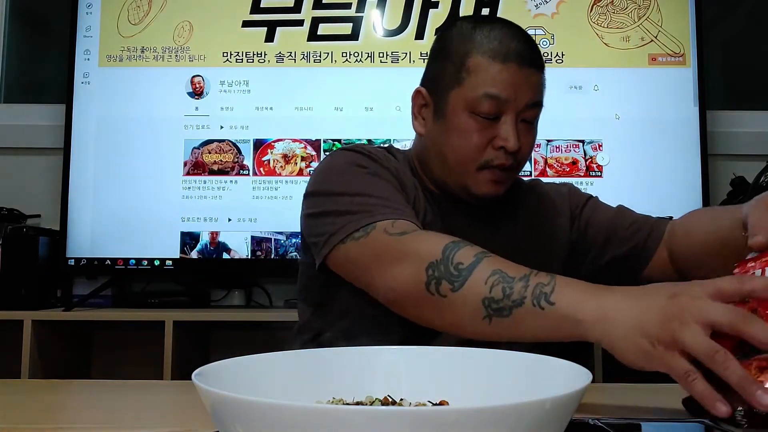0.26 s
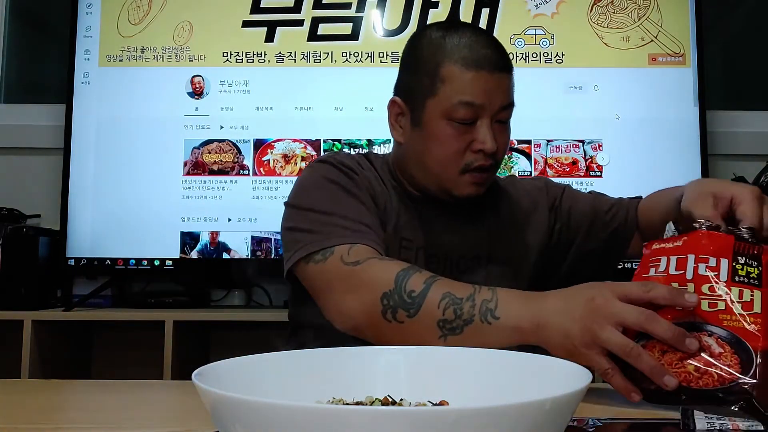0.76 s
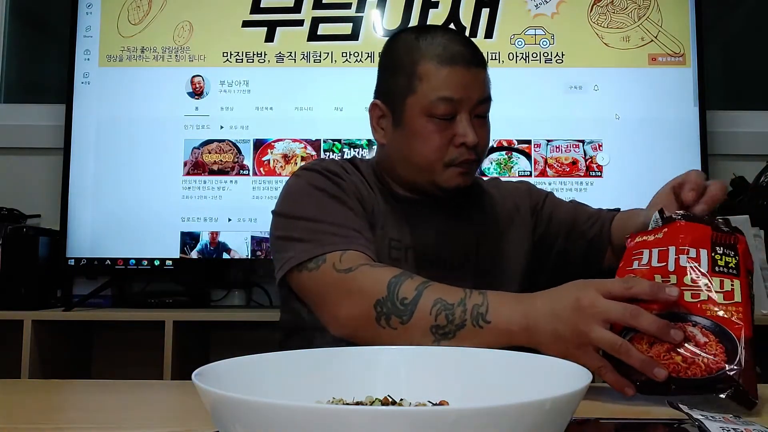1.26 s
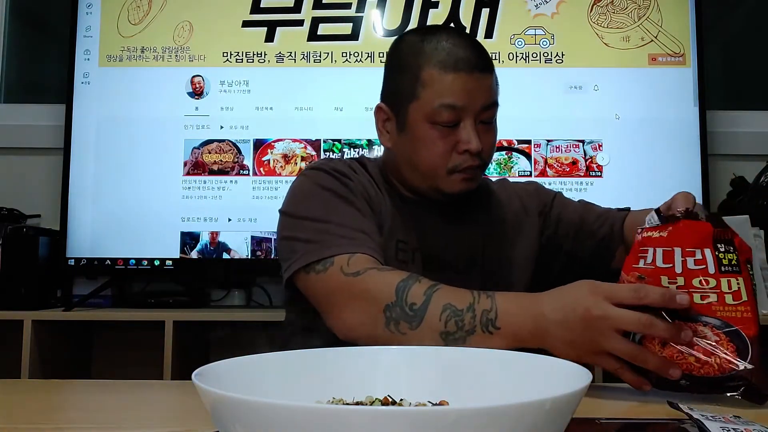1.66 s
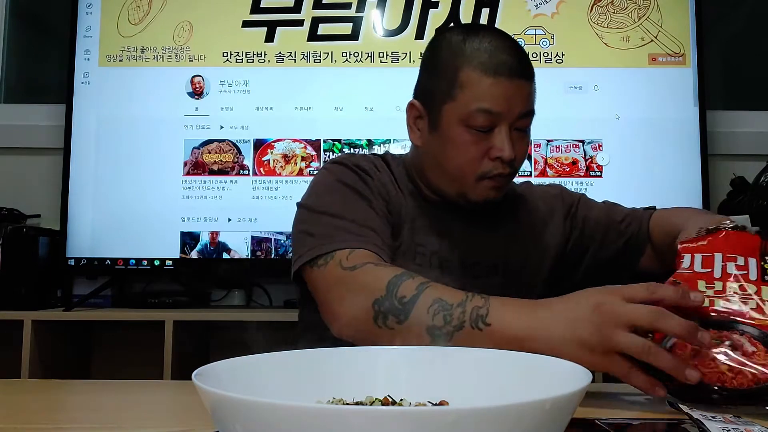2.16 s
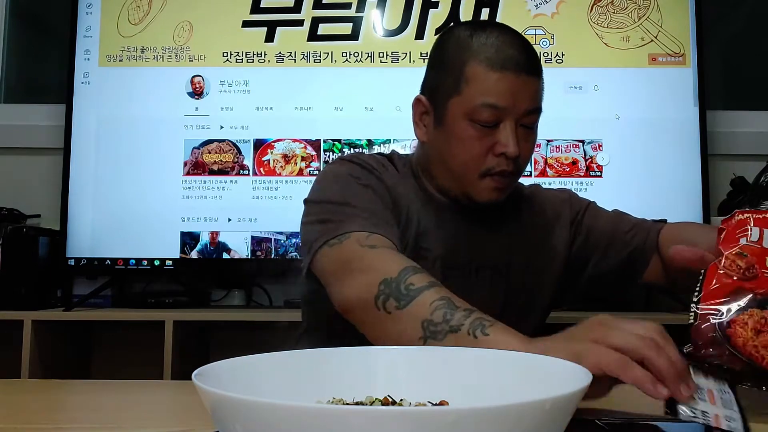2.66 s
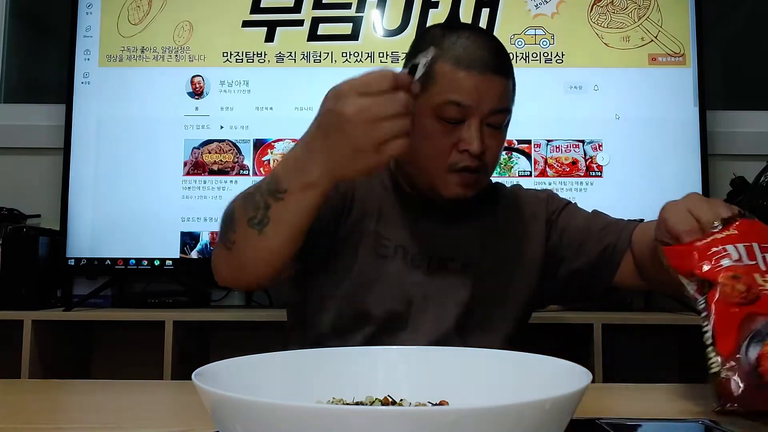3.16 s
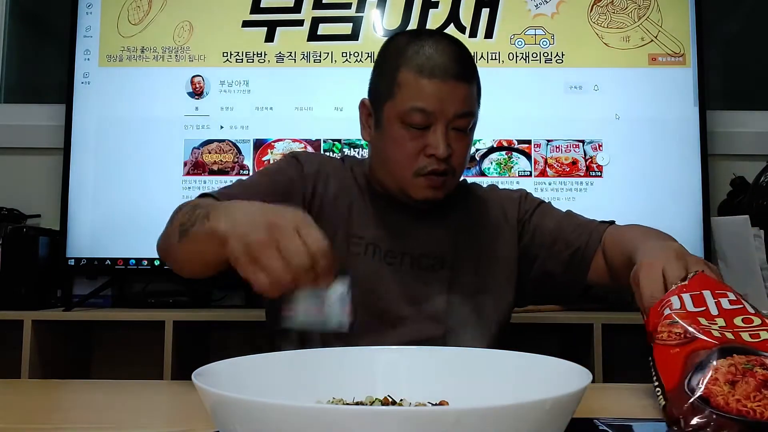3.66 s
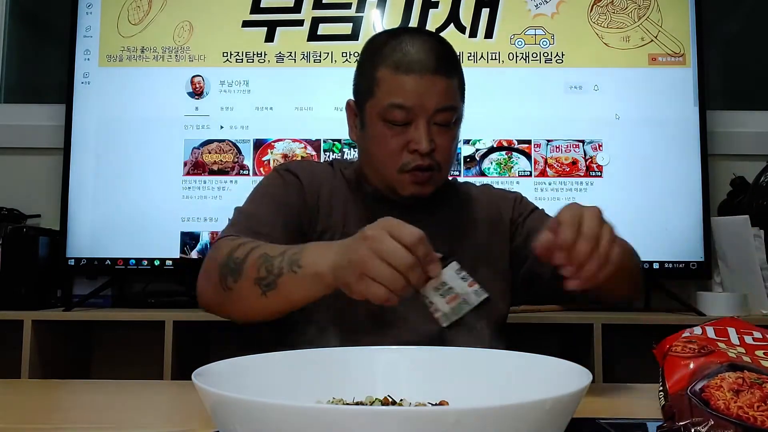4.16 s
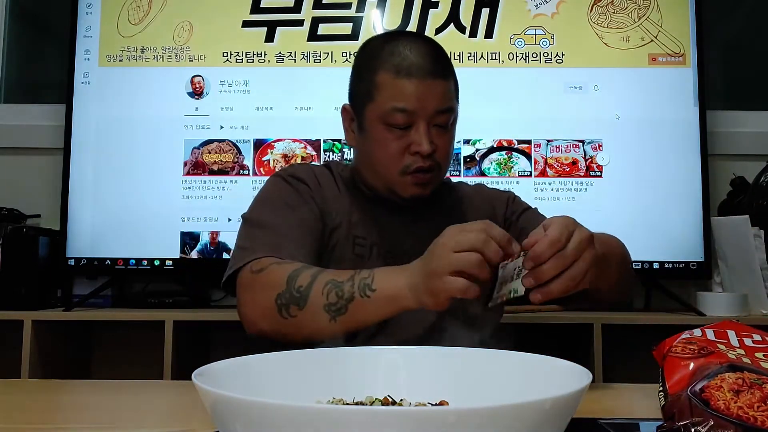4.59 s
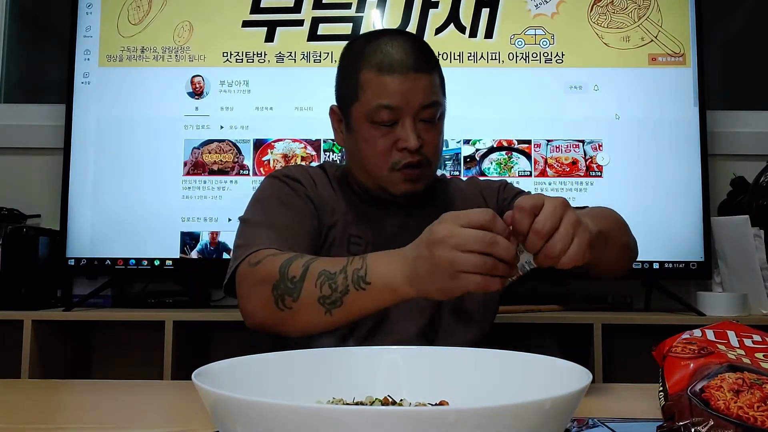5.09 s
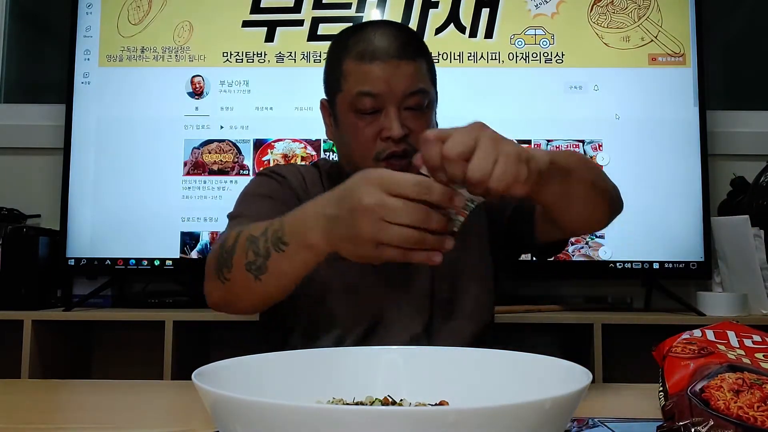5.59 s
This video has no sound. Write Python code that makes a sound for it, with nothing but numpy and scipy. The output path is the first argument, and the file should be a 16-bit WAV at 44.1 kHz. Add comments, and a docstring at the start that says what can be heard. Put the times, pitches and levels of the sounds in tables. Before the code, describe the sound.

Bright plastic crackling and snapping in uneven bursts, with soft hollow bag knocks, thinning to small sachet crinkles over faint room hush.

```python
"""Film of a large plastic food bag, rummaged by hands at a table in a bare room; then a small sachet, shaken and pinched.
Creases snap as short two-pitch rings with a treble spit, over a dense crackle of tiny ringing ticks.
Pushes and knocks ring the air pockets of the bag, and bumps push the table top; a steady hush lies below.
The walls answer after about 10 ms as decaying noise; the right side hears everything some 4 ms late."""
import sys
import numpy as np
from scipy import signal
from scipy.fft import rfft, irfft, next_fast_len
from scipy.io import wavfile
from scipy.ndimage import uniform_filter1d

SR = 44100
rng = np.random.default_rng(int(sys.argv[2]) if len(sys.argv) > 2 else 0)


def waveform_to_disk(signal):
    """Save audio, clipped to [-1, 1], as 16-bit WAV at the path in sys.argv[1]."""
    frames = np.transpose(np.atleast_2d(signal))
    scaled = np.clip(frames, -1, 1) * 32767
    samples = np.round(scaled).astype(np.int16)
    wavfile.write(sys.argv[1], SR, samples)


N = 257499

# Creases that snap. Each row: time in seconds, relative level in dB, pitch in Hz, second pitch in Hz,
# treble spit against the level in dB (before a fixed trim).
CREASE_SNAPS = [(0.036, -23.5, 6000, 4500, -6), (0.1, -34, 1650, 2130, -17), (0.154, -40, 1590, 3980, -23),
                (0.261, -39.5, 2420, 3230, -17), (0.305, -35.5, 2820, 4900, -13),
                (0.326, -35.5, 2940, 1480, -15), (0.374, -34, 6500, 8200, 2),
                (0.386, -31.5, 7060, 8050, -17), (0.459, -28.5, 6400, 2770, -2.5),
                (0.498, -32, 6840, 5810, -5), (0.532, -27.5, 1570, 3100, -8), (0.547, -23, 3240, 6700, -1),
                (0.551, -22.5, 2370, 3900, -15), (0.602, -27.5, 2880, 1740, -19),
                (0.744, -36.5, 6400, 3380, -14), (0.766, -38, 4370, 2070, -14),
                (0.779, -38.5, 11700, 6370, -5), (0.929, -45.5, 1710, 3120, -25),
                (1.014, -44, 6600, 8250, -3), (1.0363, -34, 3010, 8500, -9), (1.037, -32, 6600, 4200, -4),
                (1.037, -35, 6000, 3820, -24), (1.406, -50, 2800, 1800, -20),
                (1.411, -42.5, 7750, 6800, -15), (1.437, -40.5, 4730, 6360, 1),
                (1.491, -32.5, 6750, 1660, -9), (1.495, -32.5, 1410, 5380, -7),
                (1.512, -29.5, 1480, 4370, -11), (1.534, -29.5, 2710, 5940, -12),
                (1.557, -24.5, 1320, 4570, -13), (1.632, -35, 4010, 3210, -22),
                (1.725, -33, 1700, 3070, -0.5), (1.799, -42.5, 8140, 2390, 4.5),
                (1.856, -30, 3360, 1700, -10), (1.924, -44.5, 1450, 3220, -24),
                (2.062, -26, 3030, 5300, -9), (2.079, -23, 3130, 1640, -18), (2.092, -26, 1620, 3010, -15),
                (2.123, -20.5, 2870, 1630, -11), (2.137, -25.5, 2900, 4830, 0.5),
                (2.203, -18.5, 2700, 6400, -3.5), (2.407, -30.5, 6500, 4640, -18),
                (2.491, -31, 3300, 1790, -25), (2.507, -29, 1590, 2910, -24),
                (2.516, -29.5, 2800, 5200, -17), (2.53, -32, 2770, 1480, 0), (2.609, -34, 3230, 1620, -5),
                (2.654, -27.5, 2520, 4800, -15), (2.679, -33.5, 6250, 4870, -1),
                (2.693, -30.5, 4350, 6040, -2), (2.711, -28, 2840, 5140, -6), (2.759, -38, 2980, 5140, -18),
                (2.777, -31.5, 2580, 3320, -10), (2.8, -30.5, 2660, 5070, -3),
                (2.879, -35.5, 2740, 8050, -4.5), (2.963, -31.5, 6540, 5500, -8),
                (3.043, -28.5, 4250, 1510, -1), (3.083, -27, 2420, 1460, -24),
                (3.125, -36, 1670, 8500, -14), (3.177, -30, 1460, 6070, -23),
                (3.231, -30.5, 6270, 4600, -1.5), (3.256, -34, 2800, 5620, -3), (3.297, -35, 2580, 5020, 2),
                (3.341, -39, 6160, 3900, 7), (3.353, -16.5, 4000, 4880, -9.5),
                (3.392, -23, 3760, 10000, -3), (3.43, -22, 2900, 6600, -4), (3.447, -32, 4380, 6300, 6),
                (3.487, -24.5, 2860, 2010, -3), (3.538, -37, 1880, 6600, 4), (3.546, -17, 2680, 5670, -3),
                (3.668, -26, 5000, 11200, -5), (3.735, -27, 1860, 11700, -4), (3.747, -28, 1490, 2520, 3.5),
                (3.825, -24.5, 3100, 4000, -3), (3.913, -28, 1370, 3400, 1), (3.986, -32.5, 6000, 4840, 2),
                (4.043, -30, 8900, 4800, -12), (4.325, -32.5, 4240, 5960, -3),
                (4.377, -30.5, 4160, 3300, -0.5), (4.4, -31, 3400, 8480, -5), (4.412, -32, 4250, 2080, -5),
                (4.471, -30.5, 6300, 7900, -15), (4.477, -30.5, 4460, 3500, -15),
                (4.487, -35.5, 4140, 5240, -19), (4.523, -30, 10300, 3100, 0.5),
                (4.695, -46.5, 2150, 1630, -1), (4.724, -44, 3580, 1720, -9),
                (4.806, -41, 3480, 4320, -2.5), (4.845, -42.5, 6400, 7900, -7),
                (4.891, -52, 4200, 3300, -20), (5.091, -39.5, 6100, 1450, -7.5),
                (5.161, -37.5, 3260, 5830, -21), (5.174, -35, 4080, 7600, -10),
                (5.206, -41, 4200, 3340, -4), (5.227, -37, 3460, 6440, -18), (5.243, -36, 2220, 6100, -8),
                (5.283, -25, 1480, 4470, -4), (5.3, -35, 1570, 2820, -5), (5.434, -37.5, 5800, 5100, 2),
                (5.546, -39.5, 5900, 4000, 3), (5.59, -34, 4220, 6370, -6), (5.676, -39, 6650, 4200, -5),
                (5.689, -31, 6340, 4220, 1), (5.717, -32.5, 6600, 3370, 3), (5.759, -36, 2880, 6100, 6.5),
                (5.77, -23, 6070, 3480, -5)]
# How hard the hands work the film. Each row: time in seconds, fine crackle in relative dB,
# hollow rumple in relative dB.
HANDLING_LEVELS = [(0.0, -31.5, -39.5), (0.07, -38.5, -54), (0.22, -90, -85), (0.265, -51.5, -66),
                   (0.31, -41, -46), (0.55, -46, -51.5), (0.81, -47, -59), (1.0, -74.5, -69),
                   (1.3, -70, -69), (1.4, -56.5, -63), (1.49, -47.5, -61), (1.53, -41, -49.5),
                   (1.86, -48.5, -53.5), (2.0, -53, -74.5), (2.1, -29.5, -37.5), (2.4, -45.5, -60),
                   (2.52, -46, -42), (2.6, -38.5, -43), (2.72, -40, -44.5), (2.88, -52, -60.5),
                   (3.03, -45, -51.5), (3.07, -33, -31), (3.14, -43.5, -49), (3.3, -37.5, -46.5),
                   (3.4, -33, -38), (3.92, -38.5, -51), (4.05, -41, -55), (4.14, -82, -95), (4.3, -73, -54),
                   (4.35, -50.5, -81), (4.53, -35.5, -84), (4.6, -51, -67), (5.07, -77, -64.5),
                   (5.2, -43, -53), (5.27, -38, -48.5), (5.31, -31.5, -32), (5.38, -57, -51.5),
                   (5.52, -49, -61), (5.58, -45, -49), (5.84, -40, -79)]
# Colour of the crackle. Each row: frequency in Hz, relative gain in dB.
CRACKLE_COLOUR = [(590, 8.5), (1000, 10), (1260, 6), (1630, 5), (2010, 4), (2970, 5.5), (3520, 6),
                  (6420, 10.5), (7450, 7.5), (11400, 9.5), (12500, -5), (16200, -46), (22000, -120)]
# Favoured pitches of the film. Each entry: frequency in Hz.
FILM_PITCHES_HZ = (1650, 2200, 2650, 3000, 3350, 3750, 4250, 4950, 5750, 6500, 7400, 8600, 10000, 11500)
# Air pockets and folds of the bag. Each row: frequency in Hz, relative gain in dB, 60 dB decay in seconds.
AIR_POCKETS = [(262, -40, 0.005), (369, 1, 0.019), (500, 3, 0.026), (710, 6, 0.024), (970, 10, 0.018),
               (1156, 12, 0.017), (1400, 13.5, 0.011), (1700, 13, 0.014)]
# Folds that pop and knock on an air pocket. Each row: time in seconds, relative level in dB, pitch in Hz.
FOLD_KNOCKS = [(0.057, -25, 1440), (0.2, -47, 1600), (0.259, -40.5, 1150), (0.459, -33, 970),
               (0.498, -33.5, 1150), (0.534, -29.5, 1260), (0.55, -26, 680), (0.794, -35, 1400),
               (0.932, -48, 970), (1.377, -50, 1300), (1.437, -42.5, 1150), (1.555, -45, 1300),
               (1.684, -27, 1110), (1.725, -25.5, 1220), (1.844, -33.5, 760), (1.924, -37.5, 970),
               (2.077, -51, 1400), (2.134, -40, 1360), (2.203, -30, 710), (2.319, -31, 1115),
               (2.443, -27.5, 1290), (2.507, -28, 1160), (2.679, -35.5, 710), (2.913, -35.5, 1060),
               (2.961, -30.5, 1190), (3.059, -26.5, 1280), (3.179, -36, 1330), (3.353, -27, 970),
               (3.395, -28, 1310), (3.429, -32, 870), (3.544, -20.5, 806), (3.67, -39, 1280),
               (3.748, -28, 1400), (4.336, -40.5, 970), (4.375, -37.5, 1400), (4.474, -42, 1290),
               (4.522, -38, 1000), (4.684, -50.5, 970), (4.744, -48, 970), (4.843, -50, 970),
               (5.087, -49, 980), (5.161, -40.5, 1040), (5.227, -44, 990), (5.285, -40.5, 500),
               (5.301, -26.5, 1680), (5.32, -45, 500), (5.529, -45.5, 970), (5.636, -41, 970),
               (5.651, -50, 1400), (5.676, -35.5, 840), (5.69, -41, 633), (5.775, -31, 1240)]
# The bag or a wrist bumps the table. Each row: time in seconds, level of the exciting click in dB.
TABLE_BUMPS = [(0.549, -22.5), (1.038, -36.5), (1.685, -36), (1.929, -37), (2.203, -29), (3.542, -19),
               (3.742, -26), (4.377, -32), (5.687, -38), (5.835, -38)]
# Decay of the wall echoes. Each row: frequency in Hz, 60 dB decay in seconds.
WALL_DECAY = [(200, 0.2), (700, 0.22), (2000, 0.29), (5000, 0.4), (12000, 0.3)]
# Colour of the quiet room. Each row: frequency in Hz, relative gain in dB.
AIR_COLOUR = [(12, -52), (20, -1), (107, 1.5), (180, 5), (240, 7), (320, 4), (499, 3.5), (802, -4),
              (976, -2), (1290, -0.5), (1440, -16), (2020, -40), (3250, -1), (6360, -40), (11400, -12),
              (16000, -61)]
# Delay of the right side as the hands move. Each row: time in seconds, lag in samples.
RIGHT_LAG_SAMPLES = [(2.85, 188), (3.1, 177), (4.15, 177), (4.3, 182)]

SNAP_LENGTH_MS, SECOND_PITCH_DB = 2.65, -4   # second pitch against the first
SNAP_RING_CYCLES, CRACK_CYCLES, CRACK_DB = 26, 5, 3   # cycles per 60 dB decay; a sharp crack opens the ring
FLURRY_RISE_S, FLURRY_FALL_S = 0.0033, 0.0045
AFTER_SNAP_DB, AFTER_KNOCK_DB = -9, -10.5   # flurry against its snap or knock
TICK_CYCLES, TICK_SMEAR_S = 18, 0.0007
POP_CYCLES, POP_DB = 3.2, 1   # the fold itself pops as it knocks
SACHET_FROM_S, SACHET_POCKETS_HZ, SACHET_OTHERS_DB = 4.2, (500, 970), -9   # other pockets weaken
TONE_ROOM_DB, SPIT_ROOM_DB, CRACKLE_ROOM_DB, THUD_ROOM_DB = -5, -4, -1.5, -7   # sent to the walls
FIRST_ECHO_S, WALL_SETS = 0.00975, 4
AIR_RMS_DB = -71
CUTOFF_HZ = 16550


def from_db(db):
    """Decibels to amplitude."""
    return 10 ** (np.asarray(db) / 20)


def rms_one(x):
    """Scales to an RMS of 1."""
    return x / np.sqrt(np.mean(x ** 2) + 1e-20)


def in_time(rows):
    """Each column of a timed table, interpolated to every sample."""
    time_s, *columns = np.transpose(rows)
    return [np.interp(np.arange(N) / SR, time_s, column) for column in columns]


def at_hz(points, hz):
    """Table value at a frequency, interpolated over log frequency."""
    table = np.array(points)
    return np.interp(np.log(hz), np.log(table[:, 0]), table[:, 1])


def drift(rate_hz):
    """Slow chance with a spread of 1: noise through a double one-pole low-pass."""
    r = np.exp(-2 * np.pi * rate_hz / SR)
    noise = rng.standard_normal(N + SR)
    return rms_one(signal.lfilter([1], [1, -2 * r, r * r], noise)[SR:])


def ring(clicks, hz, t60_s):
    """Two-pole resonator: a unit click starts a decaying sine of height 1."""
    r = from_db(-60 / (t60_s * SR))
    w = 2 * np.pi * hz / SR
    return signal.lfilter([0, np.sin(w)], [1, -2 * r * np.cos(w), r * r], clicks + 1e-18)


def coloured(x, spectrum):
    """Gain by frequency from a (Hz, dB) table."""
    size = next_fast_len(N)
    hz = np.maximum(np.fft.rfftfreq(size, 1 / SR), 1)
    return irfft(rfft(x, size) * from_db(at_hz(spectrum, hz)), size)[..., :N]


def flat(bursts):
    """Evens out the chance colour of short bursts and keeps their shape in time."""
    spectrum = rfft(bursts)
    smooth = uniform_filter1d(np.abs(spectrum) + 1e-9, size=5)
    return irfft(spectrum / smooth, bursts.shape[-1])


def grains(median_per_s, spread_db, clump_db):
    """Random clicks of very uneven size that come in clumps."""
    born = rng.random(N) < median_per_s * from_db(clump_db * drift(40)) / SR
    sizes_db = spread_db * np.minimum(rng.exponential(1, N), 3.2)
    return born * rng.choice([-1, 1], N) * from_db(sizes_db)


def with_flurries(level_db, events, step_db):
    """Adds the power of a short swell around every event to that of the steady work; returns dB."""
    t = np.arange(N) / SR
    power = from_db(level_db) ** 2
    for time_s, event_db, _ in events:
        near = slice(max(round((time_s - .1) * SR), 0), round((time_s + .2) * SR))
        late_s = t[near] - time_s
        swell = np.exp(np.where(late_s < 0, late_s / FLURRY_RISE_S, -late_s / FLURRY_FALL_S))
        power[near] += from_db(event_db + step_db) ** 2 * swell
    return 10 * np.log10(power)


def both_sides(clicks, alike, smear_s):
    """Each side hears the click plus a short scatter of its own off hands and table."""
    t = np.arange(300) / SR
    scatter = flat(rng.standard_normal((2, 300)) * np.exp(-t / smear_s))
    scatter = rms_one(scatter) / np.sqrt(300)
    own = signal.oaconvolve(clicks[None], scatter, axes=1)[:, :N]
    heard = np.sqrt(alike) * clicks + np.sqrt(1 - alike) * own
    return heard * np.std(clicks) / np.std(heard, axis=1, keepdims=True)


def snaps(fall_share=0.38, rise_share=0.12, sway_db=1.5):
    """A crease flips: a brief push rings two pitches, and a spit of treble noise dies within milliseconds."""
    size = 900
    t = (np.arange(size) - 150) / SR
    out = np.zeros((2, 2, N + size))   # tones or spits, side, sample
    noises = rng.standard_normal((len(CREASE_SNAPS), 3, 3, size))
    sways = rng.standard_normal(len(CREASE_SNAPS)) * sway_db   # each crease faces a little left or right
    bright = signal.butter(2, [5500, 13000], "band", fs=SR, output="sos")
    shape = np.exp(np.where(t < 0, t / rise_share, -t / fall_share) * 1000 / SNAP_LENGTH_MS)
    click = np.array([8, 8, 2])[:, None, None] * (t == 0)
    for (time_s, level_db, hz, second_hz, spit_db), noise, sway in zip(CREASE_SNAPS, noises, sways):
        shared, own = noise[:, :1], noise[:, 1:]
        push = flat((0.67 * shared + own + click) * shape)
        parts = []
        for p, f in zip(push, (hz, second_hz)):
            crack = from_db(CRACK_DB) * ring(p, f, CRACK_CYCLES / f)
            parts.append(ring(p, f, SNAP_RING_CYCLES / f) + crack)
        parts = np.stack([*parts, signal.sosfilt(bright, push[2])])
        # energy follows level and length
        parts *= np.sqrt(np.sum(shape ** 2) / np.sum(parts ** 2, 2, keepdims=True))
        side_db = sway * np.array([[1], [-1]])
        part_db = np.array([0, SECOND_PITCH_DB, spit_db + 1.5])[:, None, None]
        parts *= from_db(level_db + side_db + part_db)
        at = round(time_s * SR) - 170
        out[..., at:at + size] += [parts[0] + parts[1], parts[2]]
    return out[..., :N]


def crackle(level_db, reach_db_per_octave=16.0):
    """Tiny creases tick at the film's pitches; the flurry round a snap keeps near that snap's pitches."""
    clicks = grains(median_per_s=1700, spread_db=3.5, clump_db=4.5)
    dealt = rng.integers(0, len(FILM_PITCHES_HZ), N)
    steady, out = 0, 0
    sachet_db = SACHET_OTHERS_DB * (np.arange(N) > SACHET_FROM_S * SR)   # weaker low pitches
    for k, hz in enumerate(FILM_PITCHES_HZ):
        near = []
        for time_s, snap_db, first_hz, second_hz, _ in CREASE_SNAPS:
            octaves = min(abs(np.log2(hz / first_hz)), abs(np.log2(hz / second_hz)))
            near.append((time_s, snap_db + 4.5 - reach_db_per_octave * octaves, first_hz))
        gain_db = 2.5 * drift(8) + sachet_db * (hz < 2400)
        ticks = ring(clicks * (dealt == k) * from_db(gain_db), hz, TICK_CYCLES / hz)
        ticks = both_sides(ticks, alike=0.3, smear_s=TICK_SMEAR_S)
        steady = steady + ticks
        out = out + ticks * from_db(with_flurries(level_db, near, AFTER_SNAP_DB) - 4.5)
    steady_rms = np.sqrt(np.mean(coloured(steady, CRACKLE_COLOUR) ** 2))
    return coloured(out, CRACKLE_COLOUR) / steady_rms


def hollows(rumple_db, reach_db_per_octave=32):
    """Each soft finger push rings one air pocket; a knock pops and rings mostly pockets near its pitch."""
    knock_s, knock_db, knock_hz = np.array(FOLD_KNOCKS).T
    at = np.round(knock_s * SR).astype(int)
    out = np.zeros(N)
    chance_db = rng.normal(0, 1.46, (len(at), len(AIR_POCKETS)))
    pushes = rms_one(grains(median_per_s=900, spread_db=4.0, clump_db=8.5)) * from_db(rumple_db - 27.5)
    dealt = rng.integers(0, len(AIR_POCKETS), N)
    for k, (hz, gain_db, t60_s) in enumerate(AIR_POCKETS):
        octaves = np.min(np.abs(np.log2(hz / np.array(SACHET_POCKETS_HZ))))
        sachet_db = SACHET_OTHERS_DB * (octaves > .1) * (np.arange(N) > SACHET_FROM_S * SR)
        clicks = from_db(gain_db + sachet_db) * pushes * (dealt == k)
        far_db = reach_db_per_octave * np.abs(np.log2(hz / knock_hz))
        clicks[at] += from_db(knock_db - far_db + chance_db[:, k]) * (-1) ** k
        out += ring(clicks, hz, t60_s)
    for i, (_, level_db, hz) in zip(at, FOLD_KNOCKS):
        out[i:i + 600] += from_db(level_db + POP_DB) * ring(np.arange(600) == 0, hz, POP_CYCLES / hz)
    return both_sides(out, alike=.85, smear_s=.0006)


def bumps(hz=420, t60_s=0.004):
    """A soft contact gives the table top one short, deep push: a damped ring, band-passed."""
    clicks = np.zeros(N)
    clicks[[round(s * SR) for s, db in TABLE_BUMPS]] = from_db([db for s, db in TABLE_BUMPS])
    soft = signal.butter(1, [140, 1500], "band", fs=SR, output="sos")
    return both_sides(signal.sosfilt(soft, ring(clicks, hz, t60_s)), alike=0.9, smear_s=0.0006)


def walls():
    """Dense echoes, other ones on each side, dying band by band; unit energy on average."""
    t = np.arange(round(.6 * SR)) / SR
    edges_hz = 60 * 2 ** np.arange(0, 8.5)
    late_s = np.maximum(t - FIRST_ECHO_S, 0)
    tail = 0
    for low, high in zip(edges_hz, edges_hz[1:]):
        octave = signal.butter(2, [low, high], "band", fs=SR, output="sos")
        band = signal.sosfilt(octave, rng.standard_normal((2, len(t))))
        tail = tail + band * from_db(-60 * late_s / at_hz(WALL_DECAY, np.sqrt(low * high)))
    # table and body scatter a little before the walls answer
    tail = tail * (0.34 + 0.56 * (1 - np.exp(-late_s / 0.000067)))
    return rms_one(tail) / np.sqrt(len(t))


def room(sent, turns_per_s=7.0):
    """The echoes crossfade steadily through several wall sets, so the reverberation keeps an even colour."""
    lead = SR // 4
    sent = np.concatenate([sent[lead:0:-1], sent])   # mirrored start: rustle is under way before 0 s
    place = turns_per_s * np.arange(len(sent)) / SR % WALL_SETS
    out = 0
    for k in range(WALL_SETS):
        apart = np.abs((place - k + WALL_SETS / 2) % WALL_SETS - WALL_SETS / 2)
        share = np.cos(np.pi / 2 * np.minimum(apart, 1))
        out = out + signal.oaconvolve((share * sent)[None], walls(), axes=1)[:, lead:lead + N]
    return out


def air():
    """Steady hush of the room: coloured noise, partly shared by both sides."""
    noise = rng.standard_normal((3, N))
    return from_db(AIR_RMS_DB) * rms_one(coloured(noise[0] + 1.36 * noise[1:], AIR_COLOUR))


def scene():
    """Sums the film, its wall echoes, the table and the air."""
    crackle_db, rumple_db = in_time(HANDLING_LEVELS)
    rumple_db = with_flurries(rumple_db, FOLD_KNOCKS, AFTER_KNOCK_DB)
    # keeps the snaps and crackle bright, without low rumble
    no_rumble = signal.butter(2, 900, "high", fs=SR, output="sos")
    tones, spits = signal.sosfilt(no_rumble, snaps())
    fine = signal.sosfilt(no_rumble, crackle(crackle_db))
    thin = signal.butter(4, 280, "high", fs=SR, output="sos")   # light film radiates little bass
    dull = signal.sosfilt(thin, hollows(rumple_db))
    sent = from_db(TONE_ROOM_DB) * tones[0] + from_db(SPIT_ROOM_DB) * spits[0]
    sent = sent + from_db(CRACKLE_ROOM_DB) * fine[0] + from_db(THUD_ROOM_DB) * dull[0]
    return tones + spits + fine + dull + room(sent) + bumps() + air()


def record(dry):
    """The right side comes late; the treble is softer above about 12 kHz and ends near 16.5 kHz."""
    lag = np.round(in_time(RIGHT_LAG_SAMPLES)[0]).astype(int)
    source = np.abs(np.arange(N) - lag)   # mirrored before 0 s
    late = np.stack([dry[0], dry[1, source]])
    softer = coloured(late, [(12100, 2.0), (12900, -10.0), (15000, -3.0)])   # (Hz, dB)
    return signal.sosfilt(signal.cheby2(12, 70, CUTOFF_HZ, fs=SR, output="sos"), softer)


dry = scene()
out = record(dry)
waveform_to_disk(out)
```